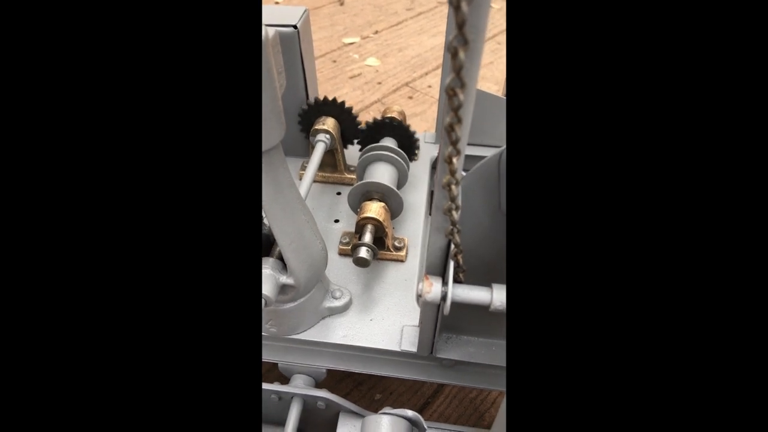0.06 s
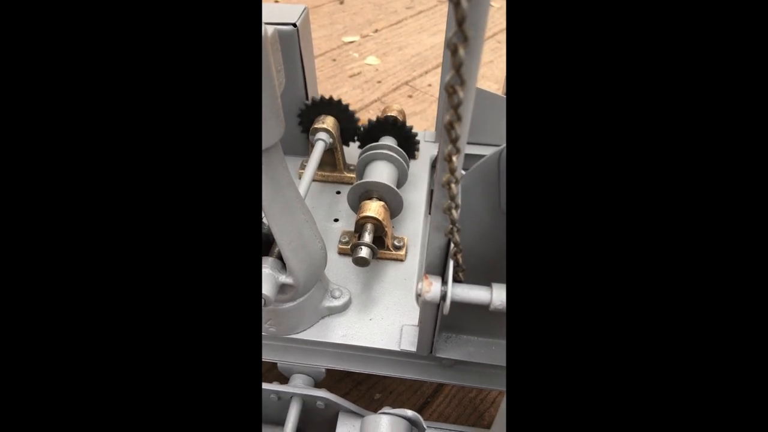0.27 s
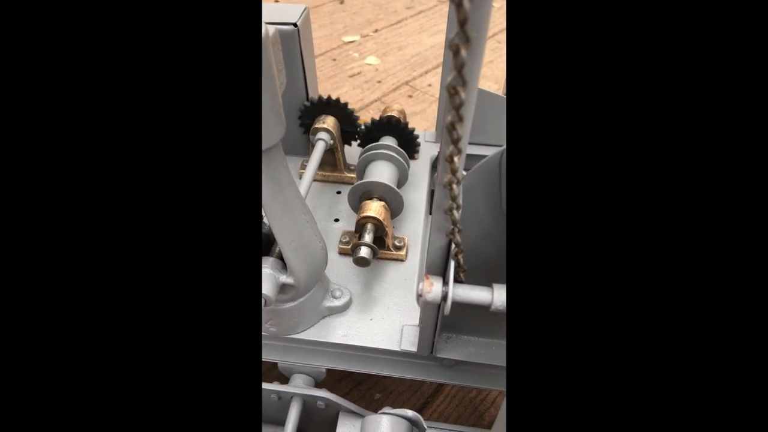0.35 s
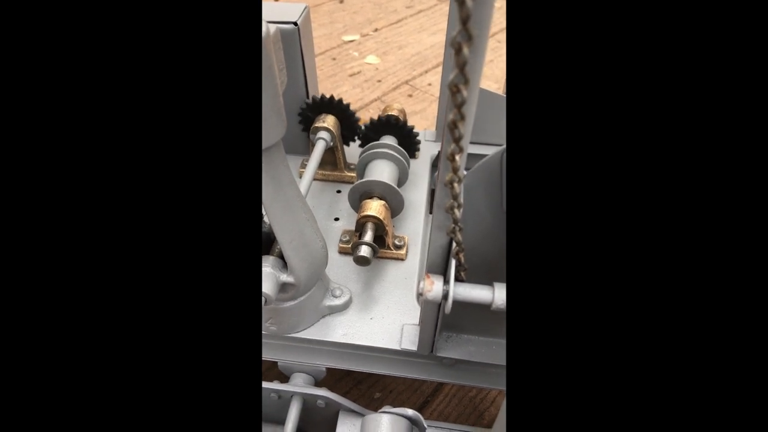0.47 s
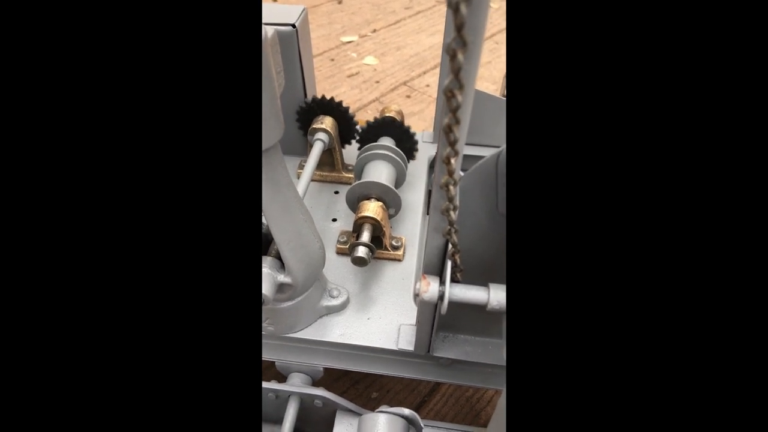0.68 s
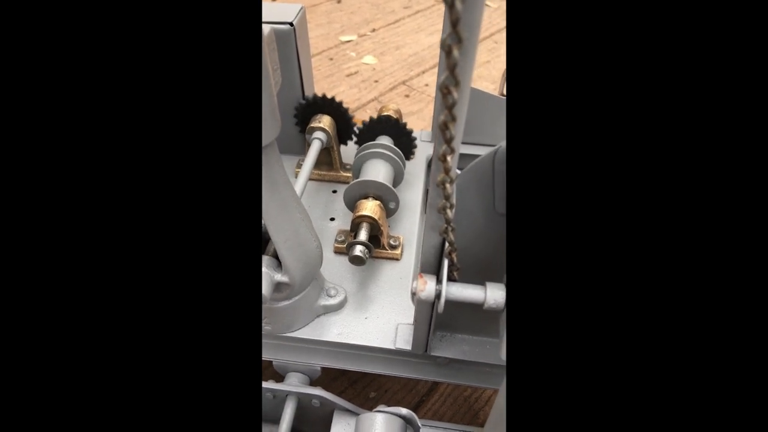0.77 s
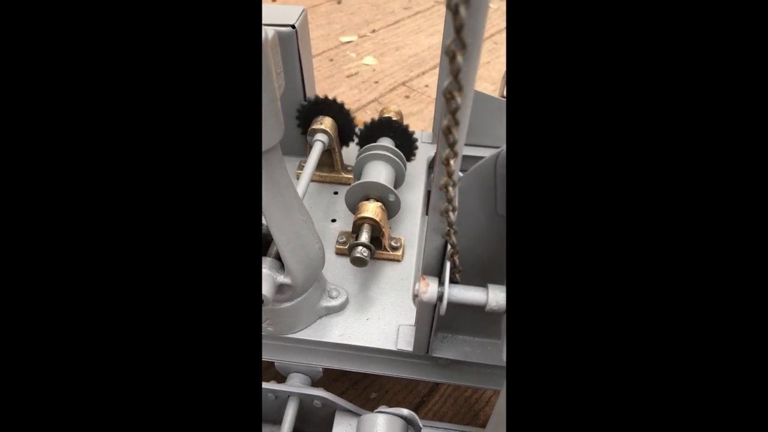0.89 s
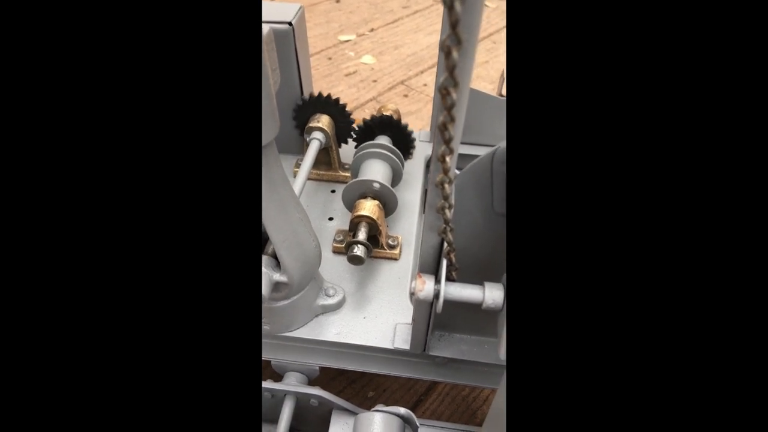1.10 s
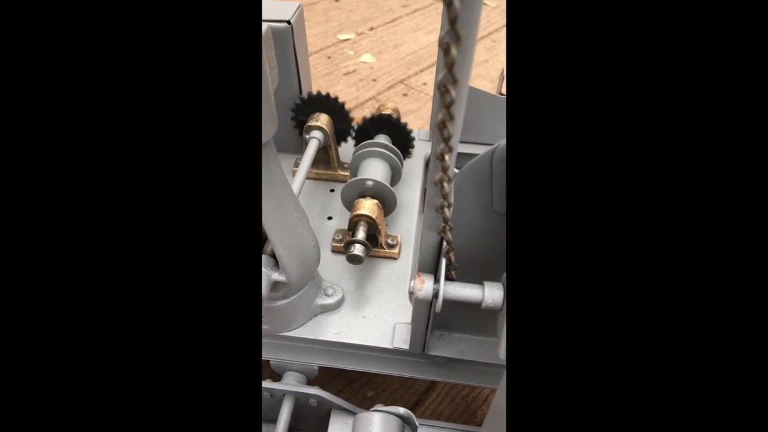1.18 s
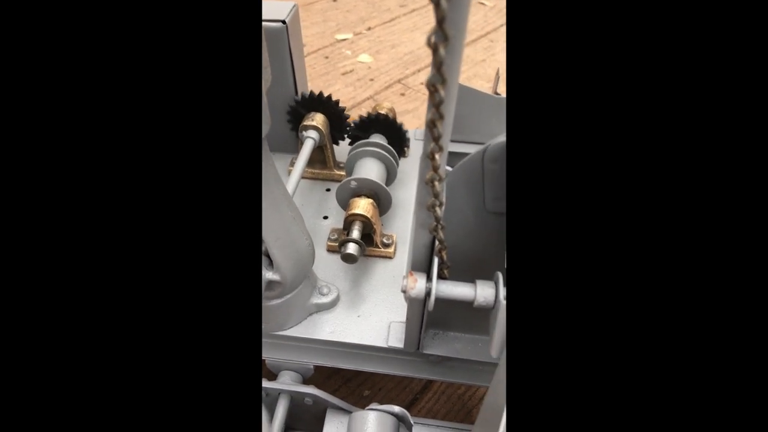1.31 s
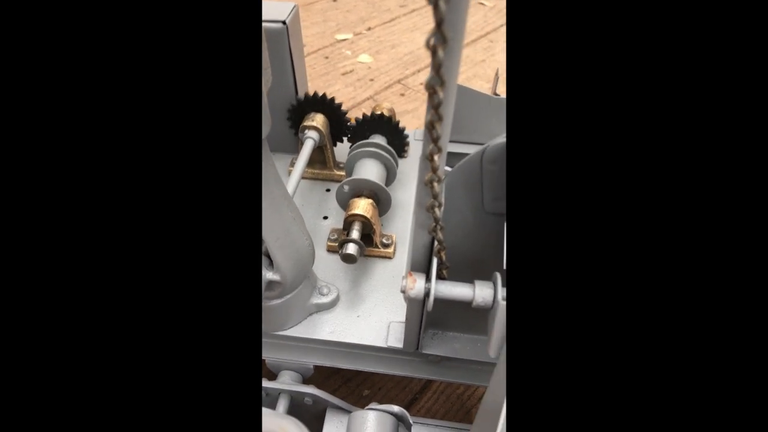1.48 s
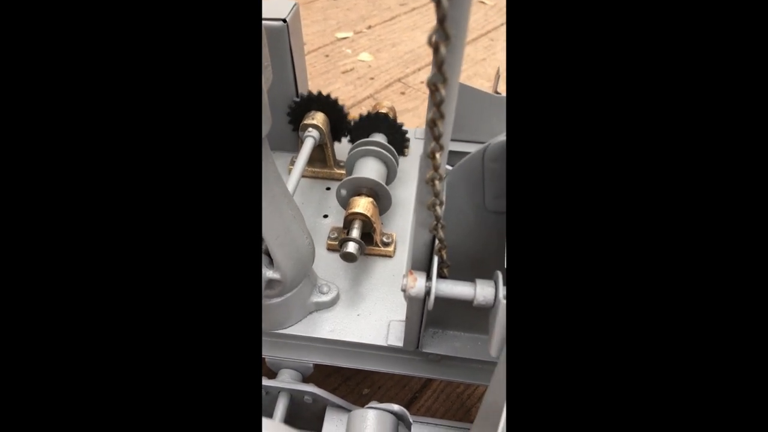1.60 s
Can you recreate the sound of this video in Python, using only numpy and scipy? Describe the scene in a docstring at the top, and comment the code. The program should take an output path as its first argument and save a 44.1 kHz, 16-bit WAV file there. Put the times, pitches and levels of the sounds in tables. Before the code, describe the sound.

One short, high squeak from slowly turning gears, followed by faint metallic scrapes and knocks.

```python
"""A pair of gears on a metal machine frame is turned slowly, outdoors, over a low rumble and a hum.
At 0.2 s a dry bearing gives one short falling squeak by stick-slip friction, which leaves the metal
ringing. The teeth scrape just after it, then knock lightly as they take up their play, exciting the
modes of the frame. Near 1.3 s they scrape again among the hardest knocks.
Only the left channel carries sound."""
import sys
import numpy as np
from scipy import signal
from scipy.fft import rfft, irfft, next_fast_len
from scipy.io import wavfile
from scipy.ndimage import uniform_filter1d, map_coordinates

SR = 44100
rng = np.random.default_rng(int(sys.argv[2]) if len(sys.argv) > 2 else 0)


def transcribe(u):
    """Save the signal u as a 16-bit wav file named by the first command-line argument.

    u: samples, shape (n,) or (channels, n), limited to [-1, 1]; the rate is SR.
    q: integer samples, one column per channel.
    """
    v = np.clip(np.atleast_2d(u).T, -1, 1)
    q = np.round(v * 32767).astype(np.int16)
    wavfile.write(sys.argv[1], SR, q)


N = 72765
t = np.arange(N) / SR


def amp(db):
    """Amplitude ratio of a level in decibels."""
    return 10 ** (np.asarray(db) / 20)


def unit(x):
    """Normalisation to rms 1."""
    return x / np.sqrt(np.mean(x ** 2) + 1e-20)


def wobble(rate):
    """Smooth random modulation: a spline through `rate` Gaussian values a second."""
    return map_coordinates(rng.standard_normal(int(N * rate / SR) + 4), [t * rate])


def filtered(x, response):
    """Linear filtering: the spectrum of x times a frequency response."""
    size = next_fast_len(N + SR // 2)
    return irfft(rfft(x, size) * response(np.fft.rfftfreq(size, 1 / SR)), size)[..., :N]


def noise(points):
    """Coloured noise of rms 1, its spectrum drawn through (frequency_hz, level_db) points."""
    freqs, db = np.transpose(points)
    white = rng.standard_normal(N)
    return unit(filtered(white, lambda hz: amp(np.interp(np.log(hz + 1), np.log(freqs), db))))


def fade(t60):
    """Exponential decay by 60 dB in t60 seconds."""
    return np.exp(-np.log(1000) * t / t60)


def swell(start, length):
    """A rounded envelope: the square root of a half sine."""
    progress = np.clip((t - start) / length, 0, 1)
    return np.sqrt(np.abs(np.sin(np.pi * progress)))


def ring(modes, scatter_db):
    """Modal superposition: damped sines of alternating sign, their levels randomly scattered."""
    return sum((-1) ** k * amp(db + scatter_db * rng.standard_normal())
               * fade(t60) * np.sin(2 * np.pi * hz * t) for k, (hz, db, t60) in enumerate(modes))


def convolved(x, impulse_response):
    """Forced response of a linear body, by convolution."""
    return signal.fftconvolve(x, impulse_response)[:N]


def squeak():
    """Stick-slip oscillation in the dry bearing drives its modes and echoes between the frame's plates."""
    # stick-slip fundamental: time_s, pitch_hz
    glide = [(.212, 3450), (.2185, 3135), (.226, 3020), (.235, 2930), (.241, 2818), (.247, 2818),
             (.251, 2935), (.258, 2947), (.265, 2900)]
    # its envelope: time_s, level_db
    envelope = [(.211, -49), (0.219, -47), (0.219, -24.5), (.227, -21.5), (0.234, -22.5), (0.24, -25.5),
                (0.244, -29), (.251, -22.5), (0.259, -19.5), (0.266, -54)]
    # harmonics from the second up, relative to the fundamental: start_db, end_db
    harmonics = [(-3.5, -25), (-8.5, -45), (-21, -47), (-32, -47)]
    # bearing modes: frequency_hz, level_db, t60_s
    bearing_modes = [(2815, 0, .16), (2902, -7, .17), (3035, -11, .1), (3202, -6, .09), (3460, 2, .06),
                     (3610, -8, .09), (4673, -6, .09), (5635, 10, .17), (5857, -6, .1), (6223, 3, .05),
                     (6460, 1, .04), (6970, -2, .07), (7110, 0, .07), (7644, -11, .12), (8500, -5, .05),
                     (8780, -7, .13), (9950, -8, .05), (11300, -3, .04), (12850, -3, .04),
                     (14700, -12, .04)]
    bite_s, buildup_per_s = .2175, 120
    times, levels = np.transpose(envelope)
    pitch = np.interp(t, *np.transpose(glide)) * (1 + .007 * wobble(700))
    phase = 2 * np.pi * np.cumsum(pitch) / SR
    bite = .5 + .5 * np.tanh((t - bite_s) / .0008)  # overtones and rasp set in as the contact bites
    overtones = sum(amp(np.interp(t, [times[0], times[-1]], span_db)) * np.sin(k * phase)
                    for k, span_db in enumerate(harmonics, 2))
    grip = amp(np.interp(t, times, levels) + .8 * wobble(292.4))
    grip = uniform_filter1d(grip * (t > times[0]) * (t < times[-1]), size=90)
    tone = grip * (np.sin(phase) + bite * overtones)
    chatter = amp(-32.5) * swell(start=.247, length=.015)  # the contact lets go roughly
    rasp = amp(-27) * grip * bite
    friction = (chatter + rasp) * noise([(1000, -15), (3000, -9), (8000, 0), (15000, -32)])
    reflections = rng.standard_normal(N) * fade(t60=.11)
    echo = convolved(tone, reflections / np.linalg.norm(reflections))
    bearing = ring(bearing_modes, scatter_db=0) * buildup_per_s / SR
    return tone + amp(-11) * friction + amp(-6) * echo + convolved(tone + friction, bearing)


def frame(tilt_db_per_octave, ring_db):
    """Impulse response to one contact: damped modes of frame and gears, and a quickly dying clatter."""
    # frame modes: frequency_hz, level_db, t60_s
    frame_modes = [(628.5, -12.5, 0.13), (782, -17, 0.13), (874, -13, 0.046), (1086, -17, 0.26),
                   (1538, -5, 0.22), (1670, -19.5, 0.42), (1654, -10, 0.031), (2110, -11.5, 0.051),
                   (2667, -18, 0.067), (2870, -6.5, .07), (3410, -11, 0.053), (4006, -8.5, 0.015)]
    # gear modes: frequency_hz, level_db, t60_s
    gear_modes = [(1910, -9, .07), (1964, -3, .14), (2011, -2, .18), (2124, -13, .1)]
    # high gear modes, strong only in bright blows: frequency_hz, level_db, t60_s
    bright_modes = [(6740, -9, 0.068), (6807, -21, 0.15)]
    # clatter spectrum: frequency_hz, level_db
    clatter_spectrum = [(200, -17), (450, -42), (700, 7.5), (1700, 14), (3000, -0.5), (4200, -1.5),
                        (5000, -9.5), (7000, -12.5), (10000, -32), (16000, -45)]
    contact_s = .00029
    tilt = lambda hz: tilt_db_per_octave * np.log2(min(hz, 8000) / 1600)
    body = ring([(hz, db + tilt(hz), t60) for hz, db, t60 in frame_modes], scatter_db=2)
    gears = amp(ring_db) * ring(gear_modes, scatter_db=1)
    gears += amp(10 * min(tilt_db_per_octave, 1)) * ring(bright_modes, scatter_db=1)
    clatter = noise([(hz, db + tilt(hz)) for hz, db in clatter_spectrum])
    clatter *= fade(t60=.03) + amp(-19) * fade(t60=.26)
    rise = 1 - np.exp(-(t / contact_s) ** 2)
    return rise * (amp(-6) * (body + gears) + amp(1) * clatter)


def knocks():
    """Impact excitation: the teeth strike as they take up their play, and the frame rings."""
    # tooth impacts: start_s, gain_db, tilt_db_per_octave, gear_ring_db
    impacts = [(.066, -50, -1.5, 1.5), (.372, -51.5, -15, 16.5), (.4844, -52, -11, -28),
               (.5662, -48, -8.5, -6.5), (.7348, -64, 2, 12), (.9005, -53.5, -0.5, 1.5),
               (.968, -55, -3.5, -13), (1.1005, -52, -1.5, -10), (1.1738, -37, -3, -28),
               (1.2525, -56.5, -7, -19), (1.2935, -50.5, -3, 9), (1.3335, -39, 5, 9), (1.350, -39, 0, 4.5),
               (1.4602, -46, -6, 8), (1.495, -48.5, -2.5, -15), (1.520, -64, 11.5, 9),
               (1.623, -63, 9.5, 7.5)]
    out = np.zeros(N)
    for start_s, gain_db, tilt, ring_db in impacts:
        start = round(start_s * SR)
        out[start:] += amp(gain_db) * frame(tilt, ring_db)[:N - start]
    return out


def scrapes():
    """Relaxation oscillation: uneven, slowing slips of the teeth shake the frame and sing faintly."""
    # sliding contacts: start_s, length_s, level_db, tilt_db_per_octave, first_slip_hz, last_slip_hz
    slides = [(0.347, .032, -46, -1.5, 850, 780), (1.284, .022, -46.5, -11.5, 1250, 810),
              (1.314, 0.019, -40.5, -6, 860, 670), (1.329, 0.025, -40.5, -3.5, 1065, 770)]
    out = np.zeros(N)
    for start_s, length_s, level_db, tilt, first_hz, last_hz in slides:
        slip_hz = np.interp(t, [start_s, start_s + length_s], [first_hz, last_hz])
        cycles = np.cumsum(slip_hz * (1 + .05 * wobble(800))) / SR
        force = swell(start_s, length_s)
        slips = np.diff(np.floor(cycles), prepend=0)  # one impulse a cycle
        slips *= amp(2.5 * rng.standard_normal(N))
        pulses = filtered(slips * force, lambda hz: 1 / (1 + 1j * hz / 3500))  # low-pass
        shake = unit(convolved(pulses, frame(tilt, ring_db=1.5))) * np.sqrt(length_s * SR / N)
        creak = amp(-7) * force * np.sin(2 * np.pi * cycles)
        out += amp(level_db) * (shake + creak)
    return out


def whistles():
    """Friction-induced vibration: a shaft beginning to bind gives thin, sagging tones."""
    # shaft tones: start_s, length_s, pitch_hz, level_db
    tones = [(.177, .045, 3580, -58), (.64, .065, 7450, -74)]
    out = np.zeros(N)
    for start_s, length_s, pitch_hz, level_db in tones:
        sag = .97 * np.clip(t - start_s, 0, length_s)
        pitch = pitch_hz * (1 - sag + .011 * wobble(490))
        out += amp(level_db) * swell(start_s, length_s) * np.sin(2 * np.pi * np.cumsum(pitch) / SR)
    return out


def rub():
    """Random excitation: sliding friction of the turning shafts keeps the frame faintly ringing."""
    # rubbing envelope: time_s, level_db
    envelope = [(0, -71), (.1, -59.5), (.28, -62.5), (.5, -85), (0.952, -71.5), (1.2, -64), (1.4, -68),
                (1.65, -75)]
    level_db = np.interp(t, *np.transpose(envelope)) + 4.5 * wobble(40.07)
    return amp(level_db) * unit(convolved(rng.standard_normal(N), frame(0, ring_db=-2)))


def background():
    """Ambient noise: low rumble, faint air and a hum wavering in amplitude and phase."""
    # rumble spectrum: frequency_hz, relative_density_db
    rumble_spectrum = [(20, -16), (35, -9), (50, 1.5), (70, 0), (115, -1), (155, -7.5), (220, -8),
                       (280, -18), (350, -23.5), (600, -33.5), (2000, -93)]
    # air spectrum: frequency_hz, relative_density_db
    air_spectrum = [(210, -56), (350, -11), (430, -10.5), (639, 1), (798, -4), (1530, -7), (2040, -14),
                    (2200, -14), (4950, -26.5), (7010, -25.5), (15500, -32.5)]
    # hum partials: frequency_hz, relative_level_db
    partials = [(182.3, 2.5), (265.5, -9)]
    # hum envelope: time_s, gain_db
    envelope = [(0, -54), (.45, -48), (.8, -50), (1.03, -53), (1.12, -65.5), (1.35, -54.5), (1.65, -63.5)]
    hum = sum(amp(db + 1.62 * wobble(9.8)) * np.sin(2 * np.pi * hz * t + .23 * wobble(7.3))
              for hz, db in partials)
    rumble = amp(-46.5 + .65 * wobble(8.13)) * noise(rumble_spectrum)
    air = amp(-61 + 1.46 * wobble(11.74)) * noise(air_spectrum)
    return rumble + air + amp(np.interp(t, *np.transpose(envelope))) * hum


def scene():
    """Superposition of all sources in the left channel; the right is silent."""
    left = squeak() + whistles() + knocks() + scrapes() + rub() + background()
    return np.array([left, np.zeros(N)])


def record(dry):
    """Band limiting: an ideal low-pass filter at 15.8 kHz."""
    return filtered(dry, lambda hz: hz < 15800)


dry = scene()
out = record(dry)
transcribe(out)
```